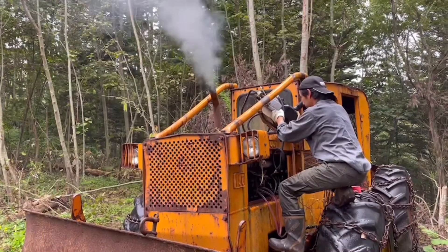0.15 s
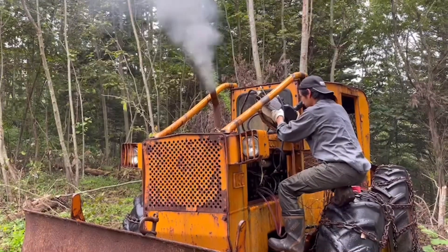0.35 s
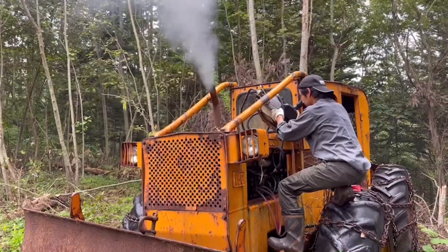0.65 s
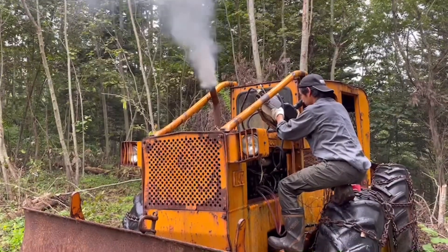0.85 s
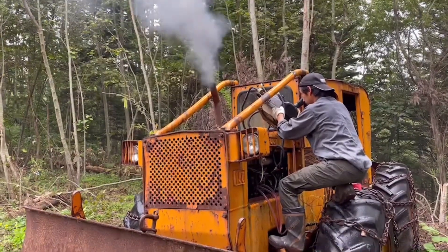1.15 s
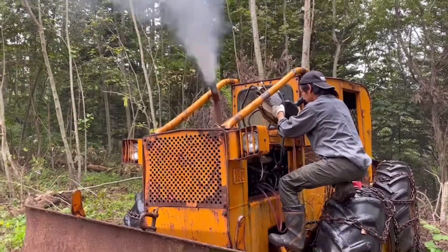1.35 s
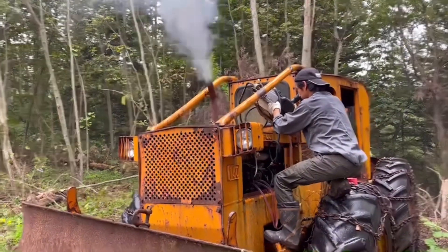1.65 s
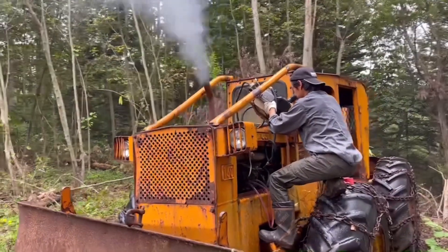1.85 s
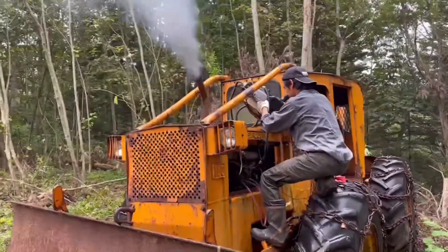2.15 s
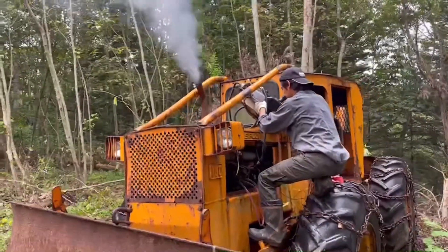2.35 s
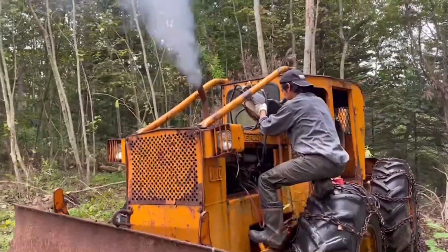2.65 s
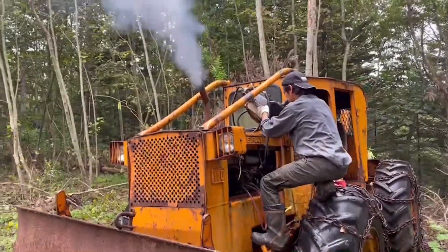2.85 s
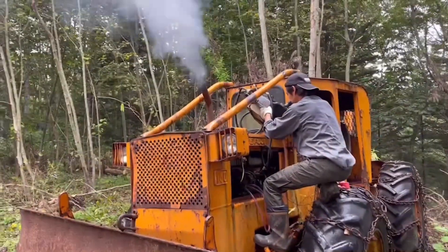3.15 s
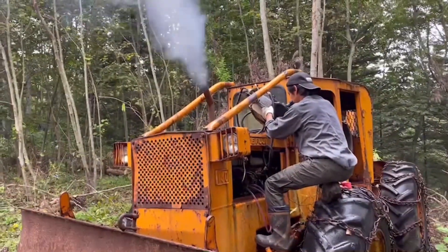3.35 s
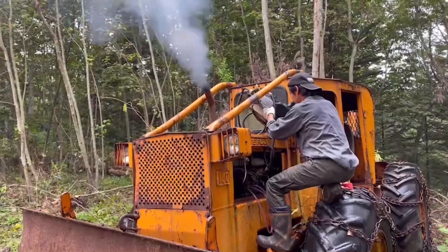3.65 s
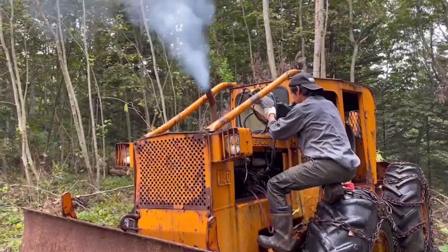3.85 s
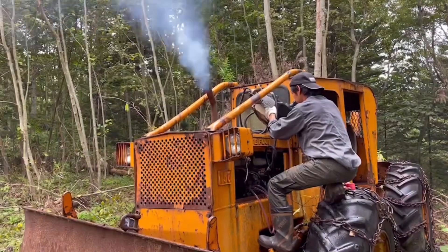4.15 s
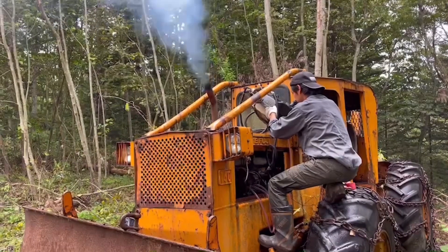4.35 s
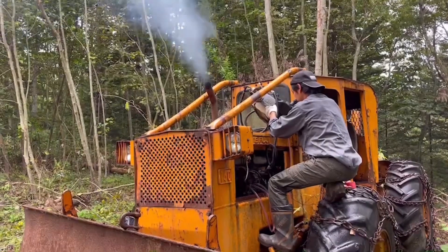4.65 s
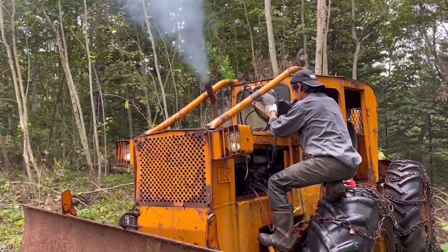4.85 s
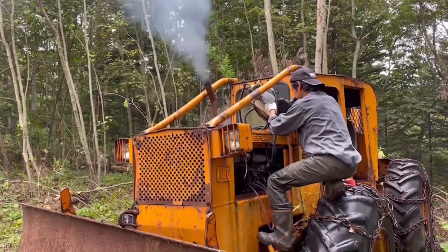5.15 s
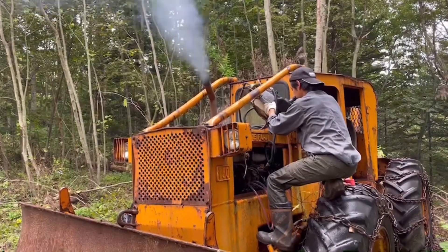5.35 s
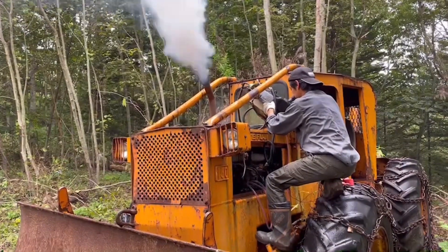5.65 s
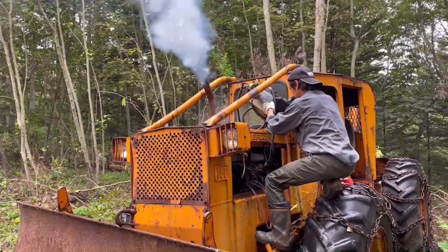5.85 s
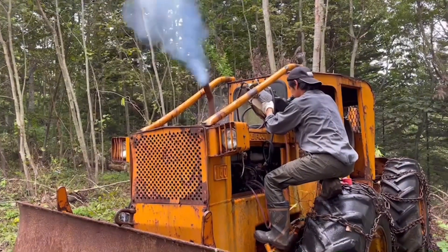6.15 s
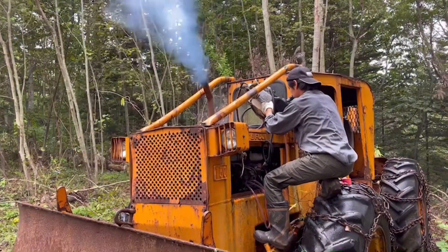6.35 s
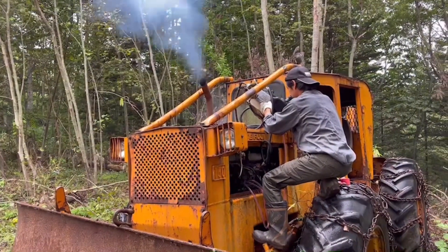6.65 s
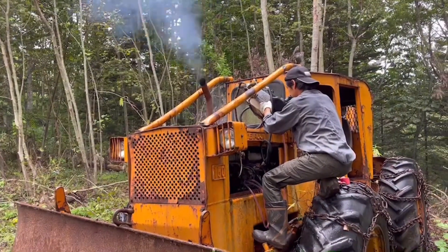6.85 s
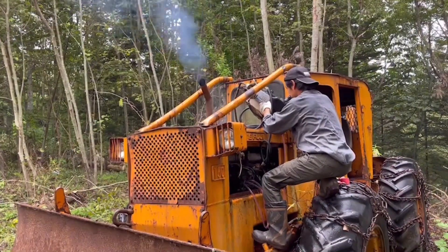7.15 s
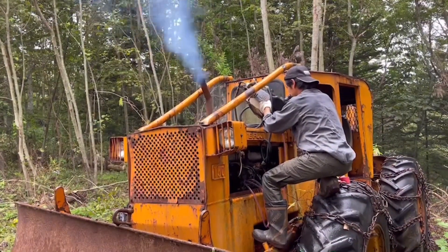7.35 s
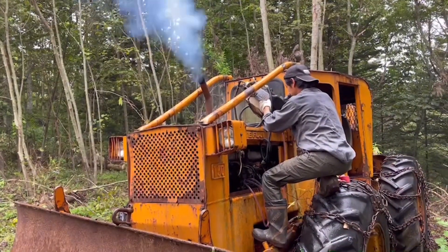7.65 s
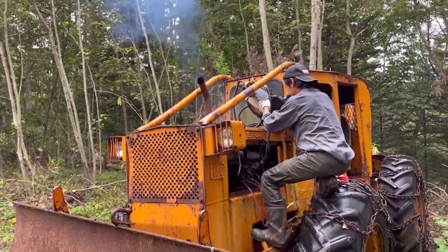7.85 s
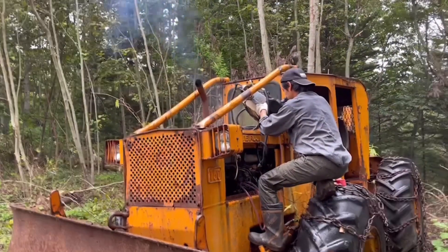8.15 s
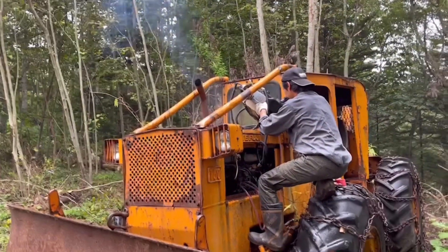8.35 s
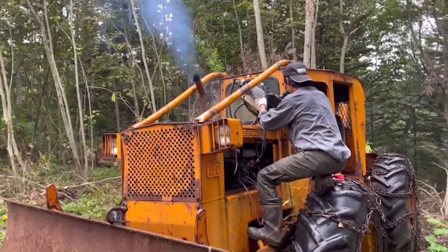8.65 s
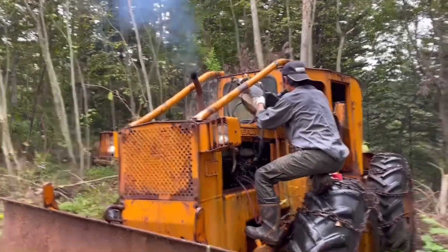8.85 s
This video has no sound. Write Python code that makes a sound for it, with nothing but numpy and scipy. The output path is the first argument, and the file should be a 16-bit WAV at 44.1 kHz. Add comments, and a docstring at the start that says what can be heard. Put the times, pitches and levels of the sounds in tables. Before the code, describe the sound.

An old diesel logging tractor runs cold in a forest clearing, knocking hard with a hollow metallic ring while a few bangs sound in the exhaust pipe. It gathers speed, coasts briefly, picks up into a faster, more even beat, coasts again, then surges unevenly with sharp cracks. Low exhaust pulses, hood rumble, clattering gears and a light hiss run underneath, heard from nearby with a faint echo off the trees.

```python
"""Cold diesel tractor in a forest clearing

An old six-cylinder logging tractor picks up speed from cold, three cylinders knocking hard and
unburnt fuel banging in the pipe; the hollow ring of the knocks rises in pitch as the engine warms.
The fuel is cut and it coasts; it picks up, the beat evens out, and it coasts again before surging
unevenly. Exhaust pulses boom in the stack, the hood rumbles and hums, tappets and gears clatter,
worn seals hiss, and the trees scatter the clatter back."""
import sys
import numpy as np
from scipy import signal
from scipy.fft import rfft, irfft, next_fast_len
from scipy.io import wavfile
from scipy.ndimage import uniform_filter1d

SR = 44100
rng = np.random.default_rng(int(sys.argv[2]) if len(sys.argv) > 2 else 0)


def materialize(psi):
    """Save the field psi as 16-bit PCM at rate SR to the path in sys.argv[1].

    A 1-D psi becomes a single channel; in a 2-D psi each row is a channel.
    """
    bounded = np.clip(np.atleast_2d(psi).T, -1, 1)
    quanta = np.round(bounded * 32767).astype(np.int16)
    wavfile.write(sys.argv[1], SR, quanta)


N = 396459
TIME = np.arange(N) / SR
HEATING_S = (0.78, 2.4)  # the hollow ring rises from cold to warm between these times
WARMING_S = 0.084  # how gradually a cylinder turns from cold to warm

# engine speed: time_s, firings_per_s
ENGINE_SPEED = [(0.0, 27.1), (0.409, 26.58), (1.362, 38.97), (1.553, 38.44), (2.163, 44.1), (2.335, 44.71),
                (3.099, 54.78), (3.615, 59.59), (4.364, 48.31), (5.005, 53.58), (5.408, 60.25),
                (5.805, 70.86), (6.419, 57.34), (6.611, 59.33), (6.982, 68.43), (7.516, 62.99),
                (7.757, 63.41), (8.091, 66.69), (9.0, 63.68)]
# fuel relative to full; two cuts, then the governor hunts: time_s, fuel_db
FUEL_FEED = [(0, -1), (2.6, 0.5), (3.44, -0.5), (3.6, -5.5), (3.75, -22), (4.19, -29), (4.225, 1), (4.3, 0),
             (4.7, -1.5), (5.72, 0.5), (5.92, -32), (6.22, -47), (6.6, 2.5), (6.96, -1), (7.03, -13.5),
             (7.48, -17), (7.7, -2.5), (8.14, -3), (8.28, -11), (8.66, -11), (8.8, -3), (8.99, -14)]
# cylinders in firing order; cold, three knock hard and three barely fire; warm, they even out:
# half_warm_s, cold_knock_db, warm_knock_db, cold_exhaust_db, warm_exhaust_db,
# knock_treble_db, knock_lag_s, liner_hz, cold_boom_delay_s, hiss_db
CYLINDER_VOICES = [(5.58, -9.5, -17.5, 8, 6, -0.5, .0006, 1970, 0.0068, -14),
                   (5.3, -41, -24.5, 3, 8, -8.5, .0018, 3300, 0.00705, 23),
                   (5.5, -44, -17.5, -48, 10.5, 1.5, 0.00118, 2200, 0.0066, 23),
                   (5.61, -12.5, -19.5, 7.5, -4.5, 0.2, .0018, 2970, 0.00886, 17.5),
                   (5.53, -16.5, -21.5, 4.5, 10.5, -0.9, 0.00019, 4630, 0.00847, 9),
                   (5.6, -52, -29.5, -45, -11, 29, .0024, 5000, 0.0071, 8)]
# tone of a combustion knock: frequency_hz, level_db
KNOCK_SPECTRUM = [(60, -3), (250, 4), (450, 3.5), (620, -2.5), (1000, -2.5), (1600, -2.5), (2400, 6.5),
                  (3000, 3), (3300, 1), (4200, -2.5), (6500, -5.5), (9000, -7.5), (11000, -9),
                  (13500, -20.5), (15500, -12.5)]


def amp(db):
    """Decibels to gain."""
    return np.exp(np.asarray(db) * (np.log(10) / 20))


def unit(x):
    """Scales to rms 1."""
    return x / np.sqrt(np.mean(x ** 2) + 1e-20)


def curve(rows, t):
    """A time table, read at the times t."""
    return np.interp(t, *np.transpose(rows))


def read(rows, hz, column=1):
    """One column of a frequency table, read on a log axis."""
    rows = np.asarray(rows)
    return np.interp(np.log(hz + 1), np.log(rows[:, 0] + 1), rows[:, column])


def add(mix, s, sound):
    """Mixes a sound in at time s."""
    part = mix[:, max(round(s * SR), 0):][:, :sound.shape[1]]
    part += sound[:, :part.shape[1]]


def wander(count, size):
    """Random drift: count values joined by ramps over size samples."""
    return np.interp(np.linspace(0, count - 1, size), np.arange(count), rng.standard_normal(count))


def colour(x, spectrum, modes=(), size=8192):
    """Minimum-phase EQ of unit energy: a broad spectrum with resonances on top."""
    hz = abs(np.fft.fftfreq(size, 1 / SR))
    peaks_db = sum(peak / (1 + (2 * (hz - f) / width) ** 2) for f, width, peak in modes)
    log_gain = np.log(amp(read(spectrum, hz) + peaks_db))
    ring = np.fft.ifft(np.exp(np.conj(signal.hilbert(log_gain)))).real[:size // 2]
    return signal.oaconvolve(x, ring[None] / np.linalg.norm(ring), axes=1)[:, :N]


def crank():
    """Crank position, counted in firings."""
    return np.cumsum(curve(ENGINE_SPEED, TIME)) / SR - 1.483


def firings():
    """Time of every firing, the row of its cylinder, and how warm that is (0-1)."""
    position = crank()
    index = np.arange(np.ceil(position[0]), position[-1]).astype(int)
    times = np.interp(index, position, TIME)
    cylinders = np.array(CYLINDER_VOICES)[index % len(CYLINDER_VOICES)]
    return times, cylinders, .5 + .5 * np.tanh((times - cylinders[:, 0]) / WARMING_S)


def octaves(t):
    """Engine speed in octaves above 60 firings a second."""
    return np.log2(curve(ENGINE_SPEED, t) / 60)


def effort(per_fuel, db_per_octave):
    """Gain of a part that grows louder with fuel and changes with engine speed."""
    return amp(per_fuel * curve(FUEL_FEED, TIME) + db_per_octave * octaves(TIME))


def chill():
    """How cold the cylinders are as a whole: 1 at first, 0 once all have warmed."""
    return .5 - .5 * np.tanh((TIME - np.array(CYLINDER_VOICES)[:, 0].mean()) / WARMING_S)


def heat(t):
    """How far the hollow ring has risen from cold to warm (0-1)."""
    return np.interp(t, HEATING_S, [0, 1])


def hollow_ring(x, spectrum, steps=5):
    """Gives a sound a hollow ring that rises in pitch, step by step, as the engine warms."""
    # peaks and dips of the ring: warm_hz, width_hz, warm_db, cold_hz, cold_db
    resonances = [(734, 48, 6.5, 700, 9), (804, 48, 7.5, 770, 4), (1062, 260, 6.5, 975, 4),
                  (1170, 58, 3.5, 1090, 7), (1477, 197, 7, 1360, 10), (1635, 84, -2.5, 1470, 4),
                  (1850, 245, 6, 1806, 4), (2025, 78, -3, 2250, 4.5), (2207, 90, 3.5, 2130, 1.5),
                  (2510, 120, 3, 2430, 0.5), (2740, 90, -1.5, 2480, -5.5), (2830, 120, 1.5, 2400, 7),
                  (3387, 163, 6.5, 3140, 4), (4370, 210, 3.5, 3780, -1.5), (5040, 150, 3.5, 5400, -7),
                  (5490, 103, 6, 5500, 4.5)]
    out = np.zeros((2, N))
    warm_hz, width_hz, warm_db, cold_hz, cold_db = np.transpose(resonances)
    edges = [0, *np.linspace(*HEATING_S, steps - 1), N / SR]
    for start, end, warmth in zip(edges, edges[1:], np.linspace(0, 1, steps)):
        hz = cold_hz + warmth * (warm_hz - cold_hz)
        db = cold_db + warmth * (warm_db - cold_db)
        add(out, start, colour(x[:, round(start * SR):round(end * SR)], spectrum, zip(hz, width_hz, db)))
    return out


def combustion(s, treble_db, liner_hz, liner_db=3.0, liner_octaves=0.24,
               rise_s=0.001408, blow_s=0.0072, tail_db=-12, tail_t60=0.078, ragged_db=4.0,
               thud_db=-7, thud_lead_s=0.002428, thud_rise_s=0.0017, size=4096):
    """Start time and sound of one knock: a ringing thud, then a rattle that peaks at s."""
    # low modes, struck by the pressure rise: pitch_hz, level_db, t60_s
    thud_modes = [(468, -6.5, 0.03), (727, -11, 0.029), (817, -7.5, 0.029), (1069, -2.5, 0.027),
                  (1129, -7.5, 0.05), (1468, -7.5, 0.035), (1859, -10, 0.036)]
    t = (np.arange(size) - size // 5) / SR
    hz = np.fft.rfftfreq(size, 1 / SR)
    # a slow crank stretches both attack and decay
    attack_s = rise_s * max(1, 38 / curve(ENGINE_SPEED, s)) ** 4
    swell = np.exp(np.minimum(t, 0) / attack_s)
    after, slowness = np.maximum(t, 0), 2 ** -octaves(s)
    blow = np.exp(-(after / (blow_s * slowness ** 0.25)) ** 1.6)
    rebound_db = ragged_db * wander(count=28, size=size)  # loose parts rebound in the tail
    tail = amp(tail_db + rebound_db - 60 * after / (tail_t60 * slowness ** 0.45))

    tilt_db = treble_db * np.tanh(np.log2((hz + 1) / 2800))
    low_shelf_db = -2 / (1 + (hz / 1400) ** 4)
    liner_ring_db = liner_db * np.exp(-(np.log2((hz + 1) / liner_hz) / liner_octaves) ** 2)
    # each blow favours other upper resonances, at the same loudness
    favour_db = 2.5 * np.interp(hz, np.geomspace(1600, 12000, 16), rng.standard_normal(16), left=0)
    noise = unit(rng.standard_normal((2, size)))
    rattle = rfft(noise) * amp(favour_db + tilt_db + low_shelf_db + liner_ring_db)
    power = np.average(abs(rattle[0]) ** 2, weights=amp(read(KNOCK_SPECTRUM, hz)) ** 2) / size
    knock = swell * np.maximum(blow, tail) * irfft(rattle / np.sqrt(power))

    age = np.maximum(t + thud_lead_s + attack_s, 0)
    # the thud is flat while cold, and each strike is slightly detuned
    tuning = 1 - 0.029 * (1 - heat(s)) + 0.019 * rng.standard_normal(len(thud_modes))
    thud = sum((-1) ** k * amp(db - 60 * age / t60) * np.sin(2 * np.pi * f * tuning[k] * age)
               for k, (f, db, t60) in enumerate(thud_modes))
    knock[0] += amp(thud_db) * (1 - np.exp(-age / thud_rise_s)) * thud
    return s + t[0], knock


def knocks(faint_db=-21, erratic_db=3, sure_db=-12, steady_db=0.6,
           treble_db_per_octave=-2.1, warm_treble_db=2.5, treble_scatter_db=1.37):
    """Firings knock as hard as fuel and warmth allow; weak ones are erratic, slow or warm ones bright."""
    # ignitions that crack out above the beat, alone or in runs as fuel returns: peak_s, level_db
    hard_knocks = [(4.249, -9.5), (4.615, -11), (5.436, -11.5), (5.625, -11), (5.671, -16.5),
                   (5.742, -16.5), (5.784, -34), (5.825, -19.5), (6.286, -24), (6.354, -30.5),
                   (6.406, -23.5), (6.456, -19.5), (6.561, -18), (6.694, -13.5), (6.712, -18.5),
                   (6.777, -16), (6.791, -13.5), (6.808, -15), (6.823, -16.5), (6.855, -17.5), (6.883, -12),
                   (6.973, -16), (7.06, -20.5), (7.331, -21.5), (7.487, -25.5), (7.537, -29),
                   (7.582, -21.5), (7.615, -18.5), (7.677, -18.5), (7.711, -17), (7.806, -16.5),
                   (7.869, -18), (7.915, -21), (7.961, -19), (8.038, -20.5), (8.142, -20), (8.187, -22),
                   (8.352, -25.5), (8.595, -26.5), (8.721, -23), (8.814, -18), (8.971, -21.5)]
    out = np.zeros((2, N))
    times, cylinders, warmths = firings()
    chance = rng.standard_normal((len(times), 2))
    replaced = [np.argmin(abs(times - s)) for s, _ in hard_knocks]  # the firing nearest each hard knock
    for k, (s, cylinder, warmth, (luck, tint)) in enumerate(zip(times, cylinders, warmths, chance)):
        _, cold_db, warm_db, _, _, treble_db, lag_s, liner_hz, _, _ = cylinder
        db = cold_db + warmth * (warm_db - cold_db) + curve(FUEL_FEED, s)
        db += luck * np.interp(db, [faint_db, sure_db], [erratic_db, steady_db])
        treble_db += treble_db_per_octave * octaves(s) + warm_treble_db * warmth
        treble_db += treble_scatter_db * tint
        start, knock = combustion(s + lag_s, treble_db, liner_hz)
        if k not in replaced:
            add(out, start, amp(db) * knock)
    for s, db in hard_knocks:
        start, knock = combustion(s, treble_db=1.5, liner_hz=2450)
        add(out, start, amp(db + 0.5) * knock)
    return hollow_ring(out, KNOCK_SPECTRUM)


def valve_gear(level_db=-29.5, cold_db=-5, taps_per_s=400, tap_db=-2, tap_t60=0.024):
    """A dense, ringing patter of tappets and gears, louder once all cylinders fire."""
    # tone of the patter: frequency_hz, level_db
    clatter_spectrum = [(100, -5), (400, 6.5), (700, 4.5), (1100, 2.5), (1700, -1.5), (2500, 2.5),
                        (4000, -11), (6500, -14), (9000, -33), (11000, -49), (13500, -25), (15500, -29)]
    spread_db = 2.5 * np.minimum(rng.exponential(1, N), 3)
    strikes = amp(spread_db) * (rng.random(N) < taps_per_s / SR)
    taps = signal.oaconvolve(strikes, amp(-60 * np.arange(2048) / SR / tap_t60))[:N]
    patter = (1 + amp(tap_db) * unit(taps)) * rng.standard_normal((2, N))
    gain = amp(level_db + cold_db * chill() * amp(curve(FUEL_FEED, TIME)))
    return gain * effort(per_fuel=0.4, db_per_octave=1) * unit(hollow_ring(patter, clatter_spectrum))


def timing_gears(level_db=-39, db_per_octave=3, slaps_per_firing=2, decay=0.73, scatter_db=3, slack=.7):
    """Loose timing gears slap unevenly through their backlash, fuel or no fuel."""
    # tone of the slaps: frequency_hz, level_db
    gear_spectrum = [(200, -11.5), (700, 5.5), (1100, 4), (1600, -5), (2500, 2.5), (3600, -12), (5300, -7),
                     (7000, -13), (15500, -32)]
    position = crank() * slaps_per_firing + slack * wander(count=900, size=N)
    luck = rng.standard_normal(N)[np.floor(position).astype(int)]
    slaps = amp(scatter_db * luck) * np.exp(-(position % 1) / decay) * rng.standard_normal((2, N))
    return amp(level_db + db_per_octave * octaves(TIME)) * unit(hollow_ring(slaps, gear_spectrum))


def seal_hiss(level_db=-40, lag_firings=0.37, rise_firings=0.21, scatter_db=1.0, warm_leak_db=8):
    """Each compression stroke lets an uneven puff of gas hiss past worn seals."""
    # tone of the leak: frequency_hz, level_db
    hiss_spectrum = [(500, -58), (2500, 8), (5500, 7), (7500, 8.5), (10500, 8.5), (13400, -1.5),
                     (15500, -9)]
    position = crank() - lag_firings
    stroke = np.floor(position).astype(int)
    luck = rng.standard_normal(N)[stroke]
    cylinder_db = np.array(CYLINDER_VOICES)[stroke % len(CYLINDER_VOICES), -1] + scatter_db * luck
    age = position % 1 / rise_firings
    leak = amp(warm_leak_db) * (1 - chill())  # once warm, every cylinder leaks a little more
    puffs = np.hypot(amp(cylinder_db), leak) * age * np.exp(-age) * rng.standard_normal((2, N))
    return amp(level_db) * effort(per_fuel=0.05, db_per_octave=-2) * unit(colour(puffs, hiss_spectrum))


def exhaust(full_bark_db=-5, bark_db_per_octave=13, full_load_db=-18, bark_growth=0.59,
            bark_uneven=0.27, bark_lead_s=0.003146, warm_delay_s=0.00745, scatter_db=1.4):
    """Each cylinder blows down into the stack just after it fires: first an even bark, then the boom."""
    # how hard the engine pulls: time_s, exhaust_db
    engine_load = [(0.0, -25.5), (0.22, -24), (0.35, -29), (0.7, -26), (1.1, -22.5), (1.45, -23.5),
                   (1.65, -26), (2.5, -26.5), (3.1, -23), (3.53, -24.5), (4.15, -41), (4.25, -25.5),
                   (4.5, -26.5), (5.1, -22.5), (5.73, -21), (6.11, -54), (6.66, -19.5), (6.98, -19),
                   (7.24, -31), (7.46, -27), (7.54, -50), (7.63, -21), (7.71, -32), (7.76, -21),
                   (8.21, -22.5), (8.54, -29), (8.84, -20.5), (8.99, -31.5)]
    # tone of the boom: frequency_hz, level_db
    boom_spectrum = [(12, -40), (30, -18), (42, -7.5), (54, 3.5), (66, 4.5), (85, -7.5), (130, -17.5),
                     (195, -16.5), (300, -49), (900, -76)]
    # resonance of the stack: pitch_hz, width_hz, gain_db
    stack_mode = [(58.5, 62, -0.5)]
    # tone of the bark: frequency_hz, level_db
    bark_spectrum = [(30, -44), (80, -6.5), (130, 1.5), (200, 3.5), (270, -4), (400, -10.5), (900, -8.5),
                     (3000, -103)]
    times, cylinders, warmth = firings()
    _, _, _, cold_db, warm_db, _, _, _, cold_delay_s, _ = cylinders.T
    boom_delay_s = cold_delay_s + warmth * (warm_delay_s - cold_delay_s)
    strength, jitter = rng.standard_normal((len(times), 2)).T
    pulse_db = cold_db + warmth * (warm_db - cold_db) + scatter_db * strength

    def pulses(delay_s, db):
        """One pulse a firing, delayed and slightly uneven."""
        train = np.zeros((2, N))
        at = np.clip((times + delay_s + .0001 * jitter) * SR, 0, N - 1).astype(int)
        train[0, at] = amp(db)
        return train

    boom = unit(colour(pulses(boom_delay_s, pulse_db), boom_spectrum, stack_mode, size=16384))
    running_power = uniform_filter1d(boom[0] ** 2, 8000) + .01
    load_db = curve(engine_load, TIME)
    # at speed and under load, the pulses steepen and the overtones bark
    bark_db = full_bark_db + bark_db_per_octave * octaves(TIME) + bark_growth * (load_db - full_load_db)
    bark_pulses = pulses(warm_delay_s - bark_lead_s, bark_uneven * pulse_db)
    bark = amp(bark_db) * unit(colour(bark_pulses, bark_spectrum))
    return amp(load_db) * (boom + bark) / np.sqrt(running_power)


def hood_rumble(level_db=-27.5, throb_db=3, lag_firings=0.4):
    """Gas rush and shaking hood panels, throbbing with the firings."""
    # tone of the rumble: frequency_hz, level_db
    rumble_spectrum = [(20, -69.5), (50, 4), (100, -5.5), (150, -1), (195, 1.5), (235, -2), (275, -5.5),
                       (330, -10), (375, -18), (430, -5.5), (520, -15.5), (800, -18), (1500, -29.5),
                       (4000, -77)]
    # slow swells of the rumble: time_s, gain_db
    swells = [(0, 3), (1.1, 4.5), (1.9, -1), (2.7, -4), (3.3, -0.5), (4.5, -3), (5.7, -3), (7.3, 0.5),
              (8.99, -0.5)]
    throb = amp(throb_db * np.cos(2 * np.pi * (crank() - lag_firings)))
    rush = colour(throb * rng.standard_normal((2, N)), rumble_spectrum)
    return amp(level_db + curve(swells, TIME)) * effort(per_fuel=0.016, db_per_octave=5) * unit(rush)


def hood_hum(level_db=-36):
    """The shaking engine hums in the hood: clean tones that glide with the speed, even coasting."""
    # engine orders: multiple_of_firing_rate, level_db
    orders = [(3.5, -3), (25 / 6, -4), (4.5, -3), (6, -7), (7, -6)]
    phase = 2 * np.pi * crank()
    tones = sum(amp(db) * np.sin(order * phase + 2 * np.pi * rng.random()) for order, db in orders)
    return np.array([amp(level_db) * effort(per_fuel=0.26, db_per_octave=9) * tones, np.zeros(N)])


def pipe_bangs(rise_s=.0012):
    """Unburnt fuel goes off in the cold exhaust pipe, which answers with a hollow ring."""
    # bangs in the pipe: start_s, level_db
    bangs = [(0.704, -17), (0.798, -16), (0.893, -22), (1.069, -10.5), (1.235, -10), (1.391, -22)]
    # modes of the pipe: pitch_hz, level_db, t60_s
    pipe_modes = [(724, 3, 0.029), (816, -0.5, 0.028)]
    out, t = np.zeros((2, N)), np.arange(4096) / SR
    ring = sum(amp(db - 60 * t / t60) * np.sin(2 * np.pi * hz * t) for hz, db, t60 in pipe_modes)
    ring *= 1 - np.exp(-t / rise_s)
    for s, db in bangs:
        add(out[:1], s, amp(db) * ring[None])
    return out


def forest(x, predelay_s=0.0075, echoes_per_s=1500):
    """Trunks scatter the sound back in sparse echoes; the mids die first."""
    # decay among the trees: frequency_hz, t60_s
    decay_times = [(100, 0.77), (1000, 0.11), (4000, 0.62), (14000, 0.89)]
    taps = rng.standard_normal((2, SR)) * (rng.random((2, SR)) < echoes_per_s / SR)
    taps *= np.arange(SR) > predelay_s * SR
    hz, t, bands = signal.stft(taps, SR, nperseg=256)
    tail = signal.istft(bands * amp(-60 * t / read(decay_times, hz)[:, None]), SR, nperseg=256)[1]
    return signal.fftconvolve(x, tail / np.linalg.norm(tail[0]), axes=1)[:, :N]


def stereo_pair(x):
    """Left and right hear row 0 with a phase and level difference, and a little of row 1 as width."""
    # stereo image: frequency_hz, left_lead_rad, left_over_right_db, side_db
    image = [(60, 0, 0, -37), (500, 0, -.5, -24), (1100, 0, -.7, -19), (1600, .2, -1.4, -11),
             (1780, .4, -5, -9), (2100, .9, .5, -11), (2500, 1.3, 0, -12), (2750, 1.35, 3, -11),
             (3200, .8, 5, -11), (3450, .55, 2.4, -11), (4250, .3, 3.5, -10), (5340, .55, 1.2, -9),
             (6300, -.3, 1.3, -11), (7100, -1.5, 3, -7.5), (7800, -3.05, .4, -15), (8300, -3.15, 0, -19),
             (9000, -3.4, 0, -11), (9700, -4.7, 0, -7), (10500, -5.8, 0, -9), (11500, -6.3, 0, -21),
             (12700, -6.6, 0, -9), (13400, -8.1, 0, -4), (14000, -9.25, 0, -13), (15400, -9.4, 0, -22)]
    size = next_fast_len(N + SR // 2)
    hz = np.fft.rfftfreq(size, 1 / SR)
    mid, side = rfft(x, size)
    lead_rad, balance_db, side_db = (read(image, hz, column) for column in (1, 2, 3))
    pan = np.exp(.5j * lead_rad) * amp(balance_db / 2)
    side *= amp(side_db)
    return irfft(np.array([(mid + side) * pan, (mid - side) / pan]), size)[:, :N]


def scene(echo_db=-15, slap_db=-16.0, slap_s=0.016):
    """The engine among the trees, mixed as mid and side; one near surface slaps each knock back."""
    metal = knocks() + pipe_bangs() + valve_gear() + timing_gears() + seal_hiss()
    echoes = amp(echo_db) * forest(metal)
    add(echoes, slap_s, amp(slap_db) * metal)
    return stereo_pair(metal + echoes + exhaust() + hood_rumble() + hood_hum())


def record(dry, cutoff_hz=15850):
    """Peaks round off at full scale, then a steep low-pass trims the top."""
    limited = dry / (1 + abs(dry) ** 8) ** (1 / 8)
    low_pass = signal.firwin(511, cutoff_hz, window=("kaiser", 9), fs=SR)
    return signal.oaconvolve(limited, low_pass[None], "same", axes=1)


dry = scene()
out = record(dry)
materialize(out)
```